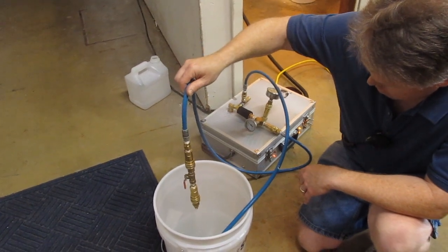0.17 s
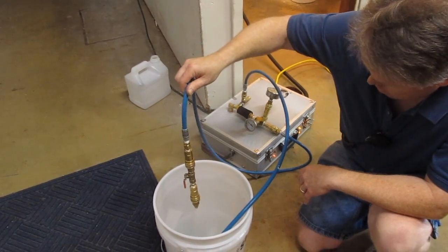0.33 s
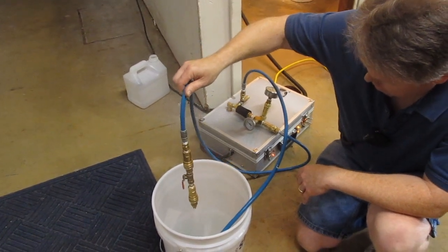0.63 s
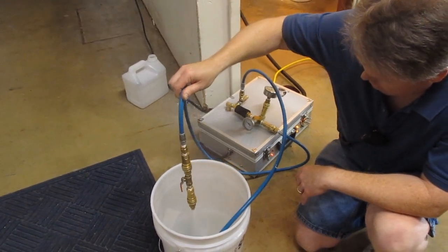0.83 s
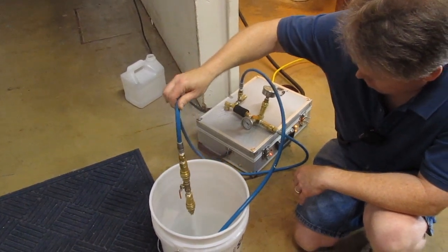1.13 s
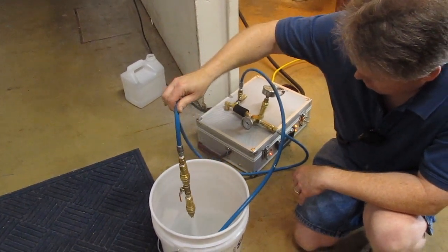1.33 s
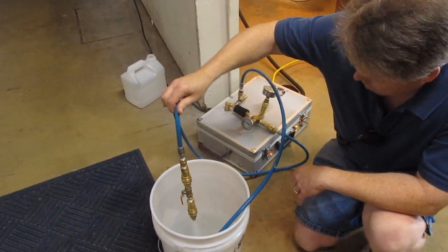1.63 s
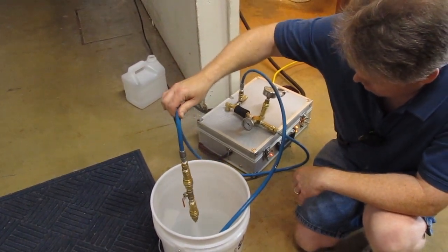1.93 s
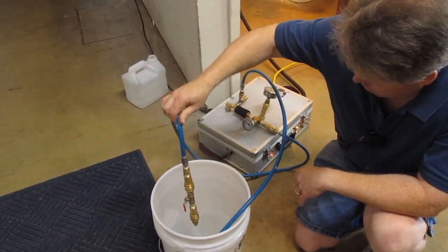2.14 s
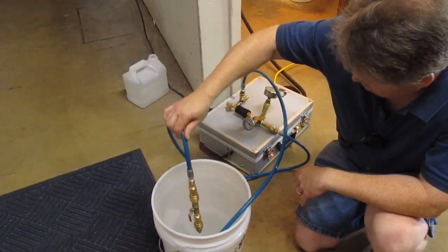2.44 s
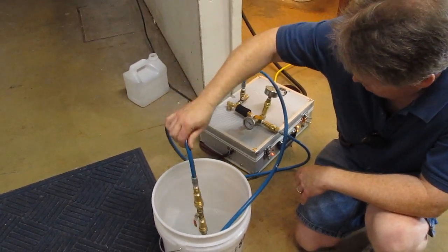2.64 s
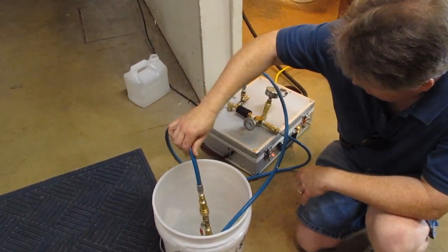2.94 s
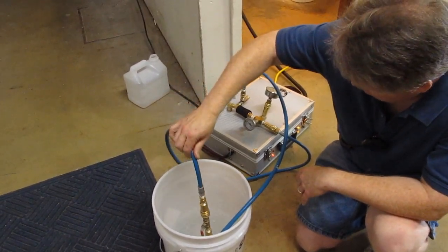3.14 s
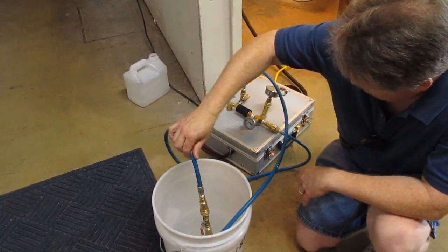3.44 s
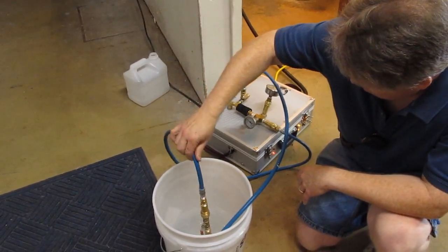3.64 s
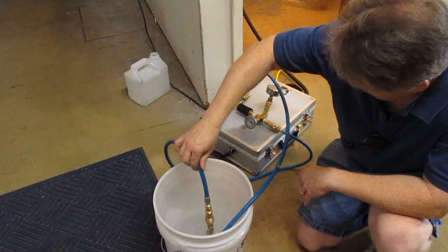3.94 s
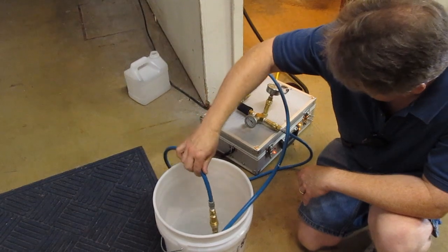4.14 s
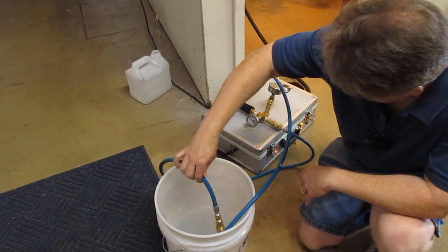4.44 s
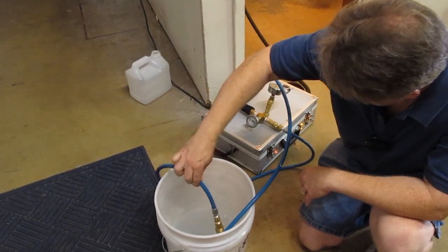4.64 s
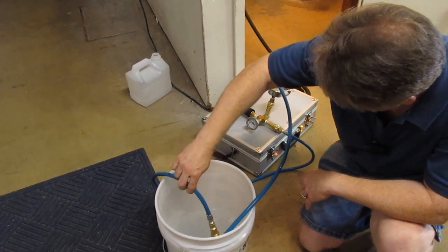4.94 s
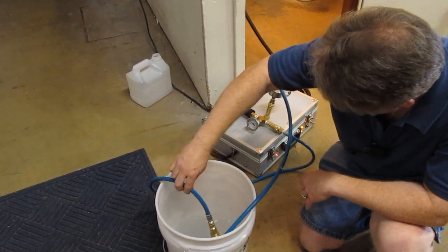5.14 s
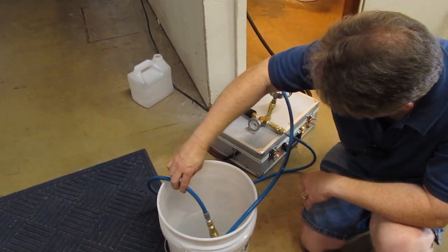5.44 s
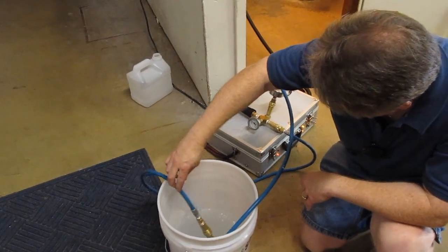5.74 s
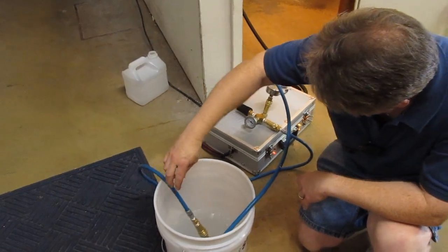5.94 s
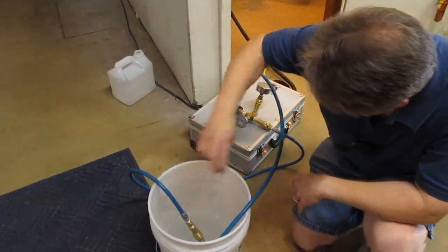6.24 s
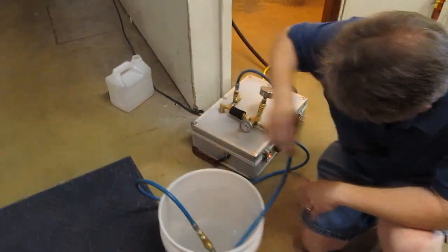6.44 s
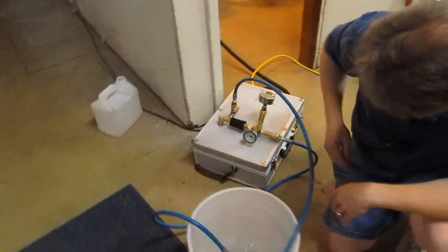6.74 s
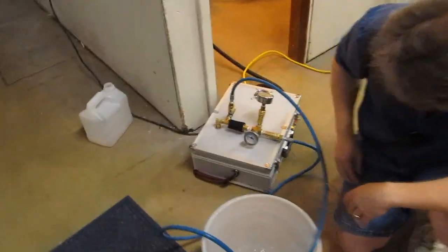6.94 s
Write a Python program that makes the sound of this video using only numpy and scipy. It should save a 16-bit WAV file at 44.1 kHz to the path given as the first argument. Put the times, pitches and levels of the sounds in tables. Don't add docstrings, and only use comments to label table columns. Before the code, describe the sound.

A small electric pump hums steadily while a water jet sprays hissily into a plastic bucket, sputters, dips under briefly muffled, then hisses against the wall.

```python
import sys
import numpy as np
from scipy import signal
from scipy.fft import rfft, irfft, next_fast_len
from scipy.io import wavfile
from scipy.ndimage import uniform_filter1d, map_coordinates

SR = 44100
rng = np.random.default_rng(int(sys.argv[2]) if len(sys.argv) > 2 else 0)


def voltage_ratio(level):
    return 10 ** (np.asarray(level, float) / 20)


def waveform_to_disk(signal):
    frames = np.transpose(np.atleast_2d(signal))
    scaled = np.clip(frames, -1, 1) * 32767
    samples = np.round(scaled).astype(np.int16)
    wavfile.write(sys.argv[1], SR, samples)


N = 312669
FRAME = 2048
TIME = np.arange(N) / SR
HZ = np.fft.rfftfreq(FRAME, 1 / SR)[:, None]
STEPS = np.arange(-(-N * 4 // FRAME) + 1) * FRAME / 4 / SR
MAINS_HZ, SHAFT_HZ = 59.98, 24.74
SINK_S = 3.628

# t/s, level/dB
PUMP_LEVEL = [(0, -39), (1.4, -41), (2.0, -40), (2.4, -38.5), (3.4, -35), (3.57, -38), (3.64, -44.5),
              (3.8, -40.5), (4.0, -39), (4.55, -36), (4.75, -35.5), (4.9, -38), (5.5, -36.5), (6.1, -39),
              (7.09, -37.5)]
# multiple of mains, level/dB
HUM_ORDERS = [(2, -1), (4, -2.5), (6, -24), (8, -22.5)]
# multiple of shaft speed, level/dB
SHAFT_ORDERS = [(2, -34), (3, -27), (4, -30), (5, -25), (6, -16), (7, -28), (8, -23), (9, -17), (10, -23),
                (11, -11), (12, -17), (14, -19), (16, -19), (17, -21), (18, -14), (19, -24), (21, -20),
                (22, -22), (23, -25), (24, -15.5), (25, -23), (27, -26), (29, -28), (33, -26), (34, -27)]
# f/Hz, level/dB
FAN_LINES = [(58.96, -21), (117.92, -15)]
# f/Hz, density/(dB per Hz)
CASING_RUMBLE = [(20, -25), (45, -22), (85, -23), (170, -15), (250, 0), (330, -8.5), (450, -7), (650, -11),
                 (900, -11.5), (1500, -17), (2500, -53)]
# multiple of shaft speed above it, level/dB
HUM_SIDEBANDS = [(1, -17), (3, -24)]
# f/Hz, density/(dB per Hz)
MIC_NOISE = [(500, -20), (4000, -3), (15800, 0)]

# t/s, level/dB, free fine spray/dB
JET_LEVEL = [(0, -19.5, 4.5), (.55, -17.5, 6), (1.2, -19, 5.5), (2.2, -19.5, 3), (2.75, -19, 0),
             (3.0, -20.5, -0.5), (3.45, -18, 0.5), (3.62, -22, 5), (3.69, -33.5, 3), (3.85, -31, -5),
             (4.07, -32, -3.5), (4.25, -26.5, -6.5), (4.66, -18, 7.5), (4.84, -20, -3), (5.75, -17, 2),
             (6.1, -19, 2.5), (6.4, -17.5, 0), (7.09, -17.5, 0.5)]
# t/s, share above, share inside
RIM_SHARES = [
    (0, 0.59, 0.048),
    (1.9, 0.76, 0.043),
    (2.8, 0.42, 0.5),
    (8, 0.13, 0.63),
]
# f/Hz, density/(dB per Hz)
SPRAY_ABOVE = [(250, -44), (500, -14.5), (800, -13), (1010, -15.5), (1270, -10), (1630, -11), (2400, -5.5),
               (4050, -3.5), (5450, -5.5), (6650, -2.5), (9000, -7), (12500, -10), (13500, -12),
               (15700, -18.5)]
SPRAY_INSIDE = [(180, -34), (300, -3), (554, -9.5), (1450, -8.5), (1770, -5.5), (2020, -12), (2260, -4),
                (3480, -11.5), (4180, -10), (5270, -10), (9110, -9), (12700, -13.5), (15700, -20)]
# f/Hz, width/Hz, level/dB
SPRAY_MODES = [
    [(2820, 410, 5), (4200, 300, -1), (6700, 600, -9)],
]
STIRRED_MODES = [(1277, 50, 0.5), (1760, 150, -2.5), (2250, 220, 2), (2630, 250, -2.5), (3320, 51, 1),
                 (4150, 120, -1), (4460, 98, -2), (6830, 490, -4), (8930, 260, -1)]
# t/s, depth/dB
GULPED_AIR = [
    (0, .6),
    (2.3, .7),
    (2.7, 1.6),
    (3.6, 1.6),
    (3.7, 3.2),
    (4.3, 2.6),
    (4.7, 1.6),
    (4.85, 1),
    (7.1, 1),
]
# t/s, lift/dB, f/Hz
JET_SPUTTERS = [(2.88, 4, 700), (2.96, 3, 2200), (2.945, -2, 12000), (3.25, 5.5, 703), (3.3, 1, 800),
                (3.34, 5, 700), (3.385, 4, 650), (3.46, 3, 600), (3.515, 4.5, 10900), (3.565, 3, 9000),
                (3.615, 7.5, 11900), (3.74, 2, 2500), (3.86, 3.5, 5000), (3.955, 11.5, 4020),
                (4.106, 7, 2180), (4.2, 4.5, 8000), (4.27, 4, 5000), (4.345, 5, 11000), (4.45, 0, 2300),
                (4.63, -2, 11100), (4.75, 4.5, 6000), (4.83, 3, 1400)]
# t/s, lift/dB, f/Hz, length/s
BAND_SWELLS = [(.55, 4, 4550, 0.25), (.6, 1, 7000, .2), (2.502, 0.5, 2250, .1), (6.48, 4, 1080, .17),
               (2.897, 8, 1180, 0.065), (2.45, 11, 1320, .04), (2.648, 7, 1100, 0.14),
               (2.7, 2, 2450, 0.094), (2.8, 4, 4400, .1), (2.85, 3, 6900, 0.091), (3.1, 5, 2660, .05),
               (3.072, 5, 6930, 0.036), (3.2, 4, 783, 0.13), (3.33, 2, 2350, .05), (3.562, 9, 4150, 0.034),
               (3.57, 10, 2660, 0.037), (3.758, 9, 3580, 0.055), (3.83, 6, 4800, .06),
               (3.9, 8.5, 2670, 0.036), (4.02, 5.5, 2750, 0.044), (4.13, 9.5, 1500, 0.072),
               (4.27, 3.5, 3600, .05), (4.34, 4, 3600, .03), (4.65, 2, 1500, .1), (4.72, 7.5, 2940, .06),
               (5.256, 3.5, 1640, 0.063), (6.7, 2, 2900, .08), (6.95, 10, 750, .15), (4.9, 1.5, 1300, 0.14),
               (4.9, 2.5, 8500, .15), (5.12, 1, 1570, 0.14), (5.36, 1.5, 3000, 0.11),
               (5.684, 6, 6100, 0.05), (5.946, 4, 5960, 0.2), (6.29, 5.5, 7100, 0.045),
               (6.35, 2.5, 2930, 0.12), (2.8, 9, 806, .1), (3.07, 3, 1000, .05), (3.03, 1.5, 4500, .1),
               (2.67, 2, 7000, .06), (3.655, 13, 4500, .025), (3.994, 6, 1240, 0.037),
               (4.84, 3.5, 1200, .04), (4.194, 3, 4600, .03), (4.246, 5, 2700, .05), (4.45, 3, 2080, 0.045),
               (4.48, 3.5, 3500, 0.077), (4.715, 8, 1320, 0.067), (4.27, 4, 1300, 0.088),
               (5.0, 0.5, 3600, .2)]
# t/s, loss/dB, f/Hz, length/s
BAND_LULLS = [(2.52, 4, 2600, .07), (2.47, 2, 4000, .05), (3.17, 3, 2300, .06), (3.2, 5, 1100, .05),
              (3.61, 13, 1300, 0.031), (3.71, 7, 4400, 0.042), (3.81, 7, 1700, 0.11),
              (4.065, 6, 2700, .025), (4.11, 6, 3800, .05), (3.72, 2, 2400, .04), (3.84, 6, 950, .05),
              (2.97, 1, 4500, .06), (4.39, 3, 3500, 0.052), (4.57, 9, 1200, 0.064),
              (4.643, -2, 2650, 0.042), (5.503, 5, 3300, 0.14), (6.428, 2, 2850, 0.041),
              (6.82, 2.5, 3600, .12), (5.85, 2, 1020, 0.27), (6.4, 2.5, 4400, .15)]
# t/s, lift/dB
FINEST_DROPLETS = [(0, 0.5), (2.8, 1), (3.5, 1.5), (3.7, 0), (4.0, 0), (4.16, -7), (4.3, 0), (4.4, 3),
                   (4.65, 1), (4.74, 2), (4.84, 4), (5.3, 1.5), (5.6, 1), (5.9, 1), (6.6, .6), (6.75, 0),
                   (7.09, -1)]
# f/Hz, likeness
SPRAY_LIKENESS = [(300, 0.98), (1400, 0.96), (3100, 0.74), (6800, 0.81), (15000, 0.76)]
DIVE_LIKENESS = [(300, 1), (1400, 0.9), (3100, 0.57), (6800, 0.69), (15000, 0.7)]
# f/Hz, phase/rad
SPRAY_LEAD = [(2000, -0.15), (3400, -0.52), (5100, -0.62), (6100, 0.73), (6800, -0.11), (12500, 0.11),
              (13700, 1), (14800, .2)]
DIVE_LEAD = [(1800, 0.31), (2400, -0.0017), (3700, -0.13), (5250, 0.058), (7100, 0.41), (7500, 0.052),
             (8400, -0.24), (11900, -1.5), (13300, -0.56)]
# t/s, lift/dB
GASPS = [
    (3.516, 3.5),
    (3.563, 2.5),
    (3.597, 1),
    (3.608, 3.5),
    (3.62, 1),
]
FLUTTER_EDGES_HZ = [900, 1900, 3200, 5500]
# t/s, level/dB, f/Hz
AIR_LUMPS = [(2.42, -37, 262), (2.52, -36, 262), (2.92, -31, 330), (3.0, -33, 278), (3.045, -33, 290),
             (3.205, -31, 270), (3.24, -32, 265), (3.3, -29, 275), (3.345, -31, 268), (3.405, -26, 278),
             (3.5, -28, 318), (3.55, -35, 315), (3.585, -30, 268), (3.615, -31, 268)]
# t/s, level/dB, f/Hz
SURFACE_SPURTS = [
    (2.451, -31, 1340),
    (2.98, -29, 11100),
    (3.22, -23, 11900),
    (3.85, -36, 4800),
    (4.27, -44, 10000),
    (4.25, -31, 3600),
    (4.33, -27, 3520),
    (4.339, -31, 8500),
    (4.48, -31, 8500),
    (4.63, -20, 8200),
]

# f/Hz, density/(dB per Hz)
JET_DEEP = [(180, -38), (300, -11), (527, -5), (622, -11), (665, -12), (2080, -5.5), (2630, -9),
            (3100, -18), (4180, -6.5), (7000, -15), (9500, -22.5), (12000, -28), (15700, -35)]
JET_AT_WALL = [(150, -70), (300, -29), (900, -16.5), (1150, -11), (2000, -6), (3800, -9), (6000, -8.5),
               (7500, -9), (9300, -15), (11000, -15.5), (13000, -22), (14500, -26), (15700, -35)]
# f/Hz, width/Hz, level/dB
SINKING_MODES = [(2530, 870, 2.5), (2830, 410, 0), (3370, 230, -1), (4500, 500, -19)]
RISING_MODES = [(2350, 480, -1), (3000, 60, 1), (3550, 260, -2.5), (3820, 24.6, -12), (4570, 200, -5),
                (4820, 90, -3), (5070, 27, -7), (5250, 36, -13), (7300, 150, -13), (8400, 48, -10),
                (9100, 44, -7), (9930, 27, -15)]
SURFACING_MODES = [(2250, 210, 0.5), (2570, 110, 0), (2814, 100, -1), (3500, 150, -2), (4520, 140, -4.5),
                   (4930, 67, -5), (6400, 42, -7), (6400, 60, -12), (7100, 340, -13), (8150, 150, -12),
                   (8610, 210, -8), (9400, 58, -8), (9910, 59, -6)]
TOUCHING_MODES = [(2890, 190, 0.5), (3240, 19, -14), (3480, 97, -3), (4390, 85, -2), (4960, 190, -4.5),
                  (6040, 100, -2), (7150, 260, -1.5), (8020, 630, -6.5)]
LEANING_MODES = [(2780, 270, -4.5), (3230, 22, -7), (3420, 84, -5), (4490, 120, -16), (4930, 100, -14),
                 (5180, 38, -3.5), (6090, 110, -3), (6800, 110, -4.5), (7160, 150, -6), (7980, 330, -10.5)]
LET_GO_MODES = [(2934, 81, 1.5), (3520, 140, -10), (4060, 42, -16), (4390, 96, -24), (4890, 120, -14),
                (5310, 200, -5), (5800, 42, -4), (6100, 150, -6), (6580, 87, -2.5), (7000, 200, -6),
                (8100, 72, -9)]
LYING_MODES = [(2816, 140, 0), (3100, 16, -5), (3350, 52, -5), (4070, 99, -18), (4760, 120, -15),
               (5400, 200, -4.5), (5870, 71, -3), (6430, 110, 1), (7430, 200, -7), (8170, 95, -16)]
ROLLED_MODES = [(2560, 92, -0.5), (2750, 42, -2), (3120, 26, -10), (3400, 100, -7), (4110, 150, -14),
                (5120, 35, -6), (5460, 100, 1.5), (6040, 29, -2), (6200, 270, -0.5), (6880, 280, 0.5),
                (7100, 150, -9), (8100, 140, -13)]
# f/Hz, width/Hz
BUCKET_LOW_MODES = [(1218, 45), (1352, 45), (1500, 60), (1622, 80), (1710, 70), (1800, 60), (1985, 75),
                    (2155, 50), (2210, 50), (2330, 70), (3120, 250)]
LOW_MODE_DRIVE = [
    (-2.5, 2.5, -0.5, 0.5, 0, -12, -3, -23, -27, -25, -17),
    (-7, -1.5, -4.5, -2, -1, -2.5, -2, 0.5, -1, -6, -7),
    (-16, -6, -21, -5, -3.5, -6, 4, -1, 4, -17, -12),
    (-6, -18, -18, -1, -1, 0, -1, 6, -11, -3, -10),
    (-2, -8, -7, 0, 2, -8, -0.5, 1, 2, -7, -7),
]
UPPER_MODE_LIFT = [
    -7,
    -1,
    -2,
    1,
    0.5,
]
MOVES_S = [
    4.15,
    4.44,
    4.785,
    5.5,
    6.2,
    6.58,
    6.85,
]
MOVE_LENGTHS_S = [
    .12,
    .1,
    .02,
    .25,
    .15,
    .12,
    .18,
]
# t/s, level/dB, f/Hz, t60/s
AIR_BUBBLES = [
    (4.106, -31, 690, .06),
    (4.238, -37, 1240, .06),
    (4.272, -27, 1240, .09),
    (3.755, -38, 720, .06),
]
# t/s, lift/dB
SURFACE_SPITS = [(3.82, 3), (3.885, 5), (3.925, 3), (3.985, 6), (4.03, 5), (4.057, 4), (4.145, 5),
                 (4.165, -4), (4.2, 2.5), (4.226, -3), (4.245, 4), (4.28, 1), (4.345, 3), (4.372, 3),
                 (4.4, 7), (4.47, 2), (4.49, -2), (4.565, -3), (4.62, -2), (4.712, 0), (4.805, 0),
                 (4.83, 3)]
# f/Hz, level/dB
PORT_BALANCE = [(30, -3), (60, 2), (110, -3), (200, -3), (380, -0.5), (700, -1), (1290, -2.5), (2380, -0.5),
                (4400, -5), (8120, -1), (15000, -5)]
# f/Hz, width/Hz, depth/(0-1)
WHISTLE_NOTCH = (7862, 115, .72)


def along(points, hz):
    f, v = np.transpose(points)
    return np.interp(np.log(hz + 1), np.log(f + 1), v)


def curves(rows, t):
    s, *cols = np.transpose(rows)
    return [np.interp(t, s, c) for c in cols]


def pulse(t, s, span_s):
    return np.exp(-((t - s) / span_s) ** 2)


def wobble(rate_hz):
    return map_coordinates(rng.standard_normal(int(N * rate_hz / SR) + 4), [TIME * rate_hz])


def drift(shape, bins, steps):
    field = uniform_filter1d(rng.standard_normal(shape), bins, -2)
    field = uniform_filter1d(field, steps, -1)
    return field / field.std()


def band_sos(edges_hz):
    return signal.butter(2, edges_hz, "band", fs=SR, output="sos")


def ringing(spectrum, modes, ring_db):
    power = voltage_ratio(along(spectrum, HZ)) ** 2
    for hz, width_hz, db in modes:
        power = power + voltage_ratio(db + ring_db) ** 2 / (1 + (1.93 * (HZ - hz) / width_hz) ** 2) ** 2
    return power / power.sum()


def colour(power):
    return np.sqrt(power / power.sum(0) * len(HZ))


def rush(gain, alike, lead, patchy_db, grain_db, surge_db, echo):
    drops = voltage_ratio(grain_db * wobble(900) + surge_db * (wobble(8.3) + wobble(25)))
    raw = rng.standard_normal((2, N)) * drops / np.sqrt(np.mean(drops ** 2))
    z = signal.stft(raw, nperseg=FRAME, noverlap=FRAME * 3 // 4)[2]
    patches = drift(z.shape[1:], bins=14, steps=5) / (1 + (HZ / 7000) ** 2)
    z = z * gain * voltage_ratio(patchy_db * patches)
    spread = np.tan(np.arccos(np.clip(along(alike, HZ), -.5, 1)) / 2)
    comb = drift((4, *z.shape[1:]), bins=3, steps=50)
    own = 0.49 * (comb[:2] + 1j * comb[2:])
    opposed = (comb[0] + 1j * comb[3]) * [[[0.9]], [[-0.9]]]
    walls = (own + opposed) * np.minimum(echo * spread, 1.5)
    wall_norm = np.sqrt(1 + np.mean(np.abs(walls) ** 2, (0, 2))[:, None])
    side = z[1] * spread
    turn = np.exp(.5j * along(lead, HZ))
    pair = (z[0] * (1 + walls) + [side, -side]) * [turn, 1 / turn] / wall_norm
    return signal.istft(pair, nperseg=FRAME, noverlap=FRAME * 3 // 4)[1][:, :N]


def tones(lines, jitter_rad, flutter_db, scatter):
    in_step_s = .082
    out = np.zeros(N)
    for hz, db in lines:
        cycles = hz * (TIME - in_step_s) + scatter * rng.random()
        level = np.sqrt(2) * voltage_ratio(db + flutter_db * wobble(5))
        out += level * np.sin(2 * np.pi * cycles + jitter_rad * wobble(4))
    return out


def pump():
    hum = tones([(k * MAINS_HZ, db) for k, db in HUM_ORDERS] + FAN_LINES, .03, .15, 0)
    shaft = tones([(k * SHAFT_HZ, db) for k, db in SHAFT_ORDERS], 0.33, 1.6, 0.97)
    rumble = rush(colour(ringing(CASING_RUMBLE, [], 0)), [(50, 0.79), (150, 1.0), (1000, 0.62)], [(50, 0)],
                  patchy_db=0.5, grain_db=-0.5, surge_db=0.5, echo=.3)
    return voltage_ratio(curves(PUMP_LEVEL, TIME)[0]) * (hum + voltage_ratio(5.0) * shaft + voltage_ratio(-1.5) * rumble)


def throb():
    out = np.zeros(N)
    for k, db in HUM_SIDEBANDS:
        for hz, carrier_db in ((2 * MAINS_HZ, 0), (FAN_LINES[1][0], -5)):
            level = np.sqrt(2) * voltage_ratio(db + carrier_db - 1.5)
            out += level * np.sin(2 * np.pi * (hz + k * SHAFT_HZ) * TIME)
    return voltage_ratio(curves(PUMP_LEVEL, TIME)[0]) * out


def hiss():
    return voltage_ratio(-59) * rush(colour(ringing(MIC_NOISE, [], 0)), [(50, .5)], [(50, 0)],
                           patchy_db=0, grain_db=0, surge_db=0, echo=0)


def wandering(gain):
    rows, cols = np.indices(gain.shape)
    share_per_db = .004
    detune = share_per_db * curves(GULPED_AIR, STEPS)[0] * drift(gain.shape, bins=60, steps=6)
    return map_coordinates(gain, [rows * (1 + detune), cols], order=1, mode="nearest")


def driven(power):
    level_db, mist_db = curves(JET_LEVEL, STEPS)
    octave = np.log2(HZ + 1)

    def patch(s, hz, span_s, octaves):
        return pulse(STEPS, s, span_s) * np.exp(-((octave - np.log2(hz)) / octaves) ** 2)

    def above(hz, octaves):
        return np.clip((octave - np.log2(hz)) / octaves, 0, 1)

    power = power * voltage_ratio(mist_db * above(3500, 1.4)) ** 2
    lift_db = curves(FINEST_DROPLETS, STEPS)[0] * above(10000, .45)
    for s, db, hz in JET_SPUTTERS:
        lift_db = lift_db + db * patch(s, hz, span_s=0.022, octaves=0.87)
    for s, db, hz, span_s in BAND_SWELLS:
        lift_db = lift_db + db * patch(s, hz, span_s, octaves=0.11)
    for s, db, hz, span_s in BAND_LULLS:
        lift_db = lift_db - db * patch(s, hz, span_s, octaves=0.16)
    return wandering(colour(power)) * voltage_ratio(level_db + lift_db)


def spray():
    above, inside = curves(RIM_SHARES, STEPS)
    power = above * ringing(SPRAY_ABOVE, SPRAY_MODES[0], ring_db=-10.0)
    power = power + inside * ringing(SPRAY_INSIDE, STIRRED_MODES, ring_db=-3.5)
    churn_from_s, churn_full_s, churn_hz, churn_db = 2.58, 3, 1180, 7
    stirred = np.clip((STEPS - churn_from_s) / (churn_full_s - churn_from_s), 0, 1)
    power = power * voltage_ratio(churn_db * (stirred - .6) / (1 + (HZ / churn_hz) ** 4)) ** 2
    close_s, after_db, after_t60_s = .008, -6.5, 0.42
    sunk = 1 / (1 + np.exp(np.clip((SINK_S - TIME) / close_s * 4, -50, 50)))
    gasps = voltage_ratio(sum(db * pulse(TIME, s, 0.0073) for s, db in GASPS))
    after = voltage_ratio(after_db - 60 * np.maximum(TIME - SINK_S, 0) / after_t60_s)
    airborne = (1 - sunk) * gasps + sunk * after
    return airborne * rush(driven(power), SPRAY_LIKENESS, SPRAY_LEAD, patchy_db=curves(GULPED_AIR, STEPS)[0],
                           grain_db=1.0, surge_db=0.43, echo=0.54)


def boom():
    drone_db, drone_hz, start_s, end_s, rise_s, lump_s = -48, 280, 2.3, 3.64, .25, .019
    rise = np.clip((TIME - start_s) / rise_s, 0, 1)
    level = voltage_ratio(drone_db) * rise * np.clip((end_s - TIME) / lump_s, 0, 1)
    pitch_hz = np.full(N, float(drone_hz))
    for s, db, hz in AIR_LUMPS:
        shape = pulse(TIME, s, lump_s)
        level = level + shape * voltage_ratio(db)
        pitch_hz += shape ** .5 * (hz - drone_hz)
    sway = 1.4 + .3 * (wobble(50) + 1j * wobble(50))
    return level * (sway * np.exp(2j * np.pi * np.cumsum(pitch_hz) / SR)).real


def fluttering(water):
    calm_db, share, rate_hz = 1, .9, 45
    depth_db = share * np.maximum(curves(GULPED_AIR, TIME)[0] - calm_db, 0)
    for edges in zip(FLUTTER_EDGES_HZ, FLUTTER_EDGES_HZ[1:]):
        band = signal.sosfiltfilt(band_sos(edges), water)
        flicker = voltage_ratio(depth_db * wobble(rate_hz) - depth_db ** 2 / 8.7)
        water = water + band * (flicker - 1)
    return water


def spurts():
    out = np.zeros((2, N))
    t = np.arange(-SR // 10, SR // 10) / SR
    for s, db, hz in SURFACE_SPURTS:
        noise = signal.sosfilt(band_sos([hz * 0.96, hz * 1.12]), rng.standard_normal((3, len(t))))
        stereo = (noise[0] + .5 * noise[1:]) / noise.std()
        puff = stereo * np.exp(-(t * hz ** .5 / 0.69) ** 2)
        out[:, round((s - .1) * SR):][:, :len(t)] += voltage_ratio(db) * puff
    return out


def dive():
    rests = [ringing(JET_DEEP, SINKING_MODES, ring_db=-5.5),
             ringing(JET_AT_WALL, RISING_MODES, ring_db=3.0),
             ringing(JET_AT_WALL, SURFACING_MODES, ring_db=3.5)]
    uppers = (TOUCHING_MODES, LEANING_MODES, LET_GO_MODES, LYING_MODES, ROLLED_MODES)
    for drive, upper, lift_db in zip(LOW_MODE_DRIVE, uppers, UPPER_MODE_LIFT):
        modes = [(*mode, db) for mode, db in zip(BUCKET_LOW_MODES, drive)]
        modes += [(hz, width_hz + 30, db + lift_db - 0.5) for hz, width_hz, db in upper]
        rests.append(ringing(JET_AT_WALL, modes, ring_db=6.0))
    power = rests[0]
    for s, span_s, rest in zip(MOVES_S, MOVE_LENGTHS_S, rests[1:]):
        share = np.clip((STEPS - s) / span_s + .5, 0, 1)
        power = (1 - share) * power + share * rest
    sunken = np.clip((TIME - 3.63) / 0.048, 0, 1)
    return sunken * rush(driven(power), DIVE_LIKENESS, DIVE_LEAD, patchy_db=curves(GULPED_AIR, STEPS)[0],
                         grain_db=1.0, surge_db=0.5, echo=0.6)


def bubbles():
    out = np.zeros(N)
    for s, db, hz, t60_s in AIR_BUBBLES:
        t = np.clip(TIME - s, 0, 1)
        level = voltage_ratio(db + 18.5 - 60 * t / t60_s) * (1 - np.exp(-t / 0.011)) ** 2
        out += level * np.sin(2 * np.pi * hz * t * (1 + 0.47 * t))
    return out


def spitting(water):
    treble = signal.sosfiltfilt(band_sos([5500, 10500]), water)
    lift_db = sum(db * pulse(TIME, s, 0.0086) for s, db in SURFACE_SPITS)
    return water + treble * (voltage_ratio(lift_db) - 1)


def scene():
    water = fluttering(spray() + spitting(dive()))
    return pump() + throb() + hiss() + water + boom() + spurts() + bubbles()


def low_pass(x):
    return signal.sosfilt(signal.butter(12, 15890, fs=SR, output="sos"), x)


def record(dry):
    m = next_fast_len(N + SR // 4)
    hz = np.fft.rfftfreq(m, 1 / SR)
    centre_hz, width_hz, depth = WHISTLE_NOTCH
    notch = 1 - depth / (1 + (2 * (hz - centre_hz) / width_hz) ** 2)
    ports = voltage_ratio(along(PORT_BALANCE, hz) * [[.5], [-.5]])
    top_hz = 15770
    mix = irfft(rfft(dry, m) * notch * ports * (hz < top_hz), m)[:, :N]
    return low_pass(mix)


dry = scene()
out = record(dry)
waveform_to_disk(out)
```